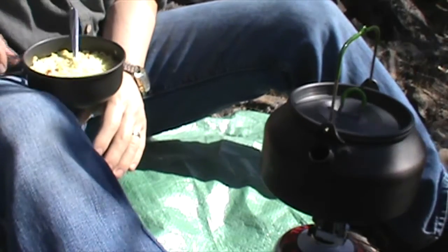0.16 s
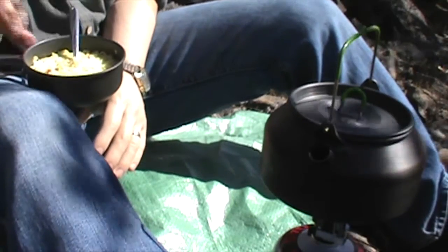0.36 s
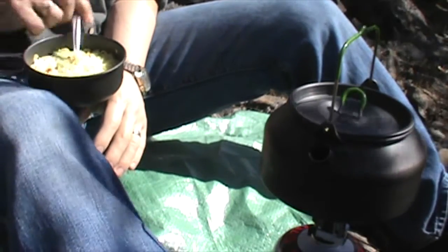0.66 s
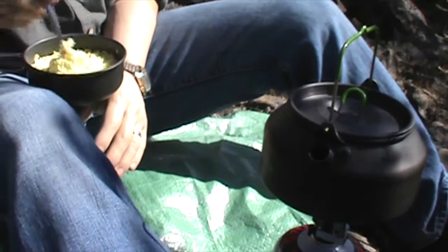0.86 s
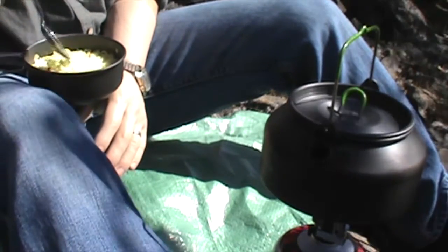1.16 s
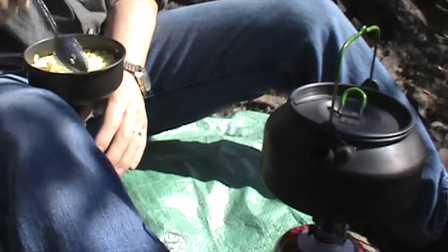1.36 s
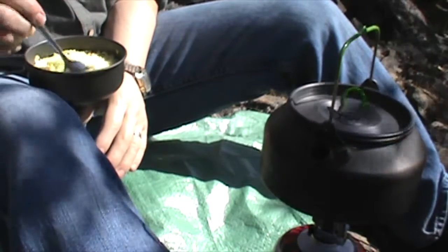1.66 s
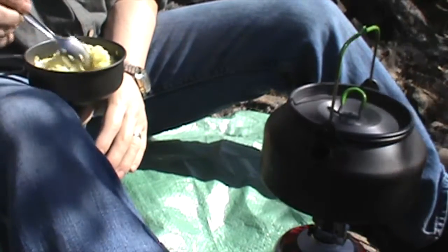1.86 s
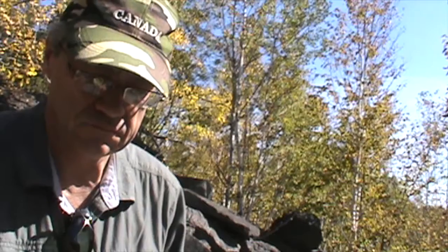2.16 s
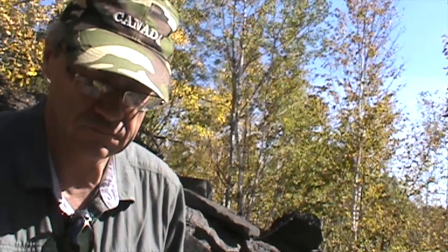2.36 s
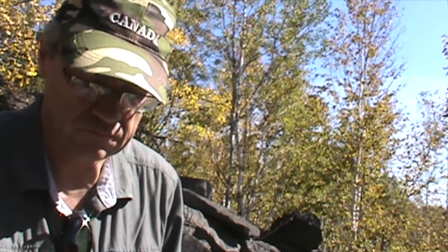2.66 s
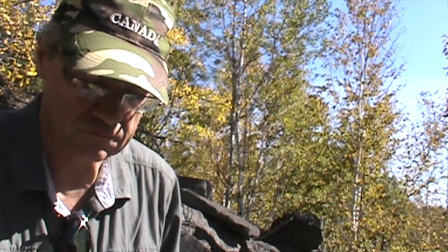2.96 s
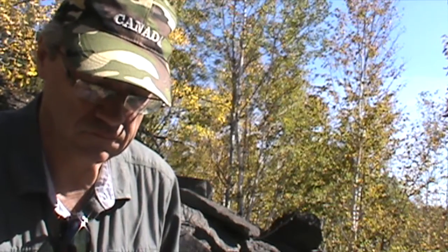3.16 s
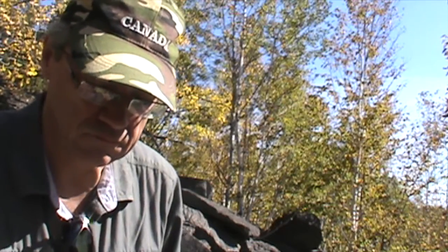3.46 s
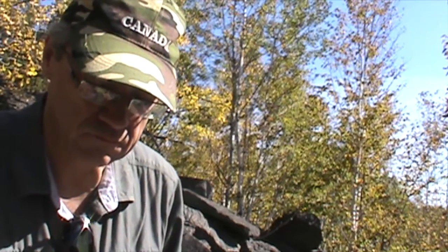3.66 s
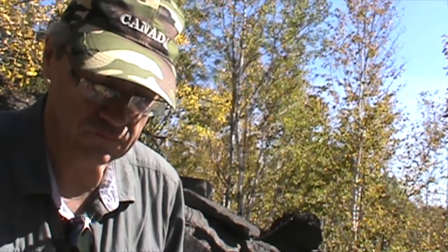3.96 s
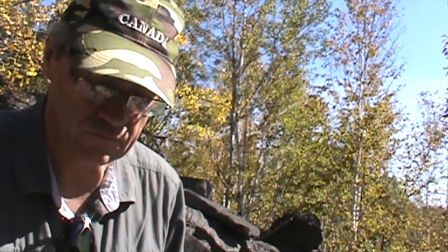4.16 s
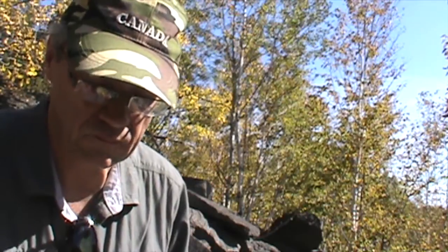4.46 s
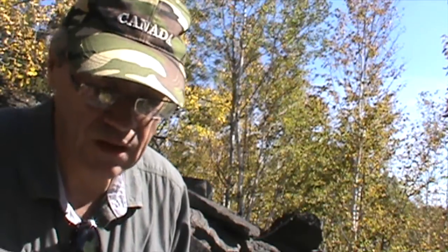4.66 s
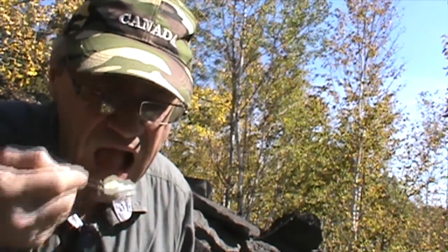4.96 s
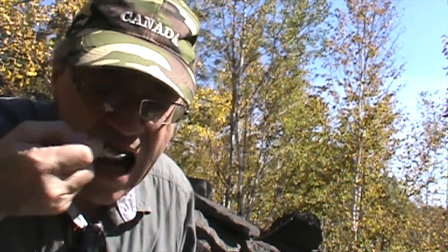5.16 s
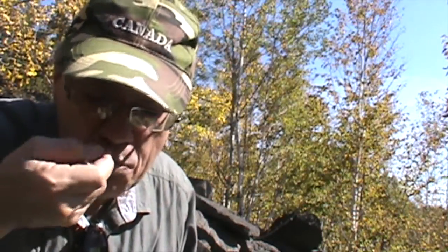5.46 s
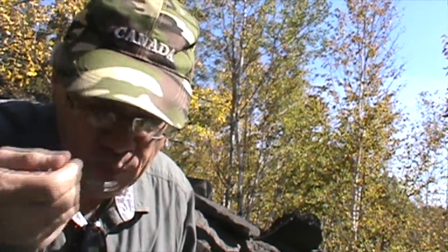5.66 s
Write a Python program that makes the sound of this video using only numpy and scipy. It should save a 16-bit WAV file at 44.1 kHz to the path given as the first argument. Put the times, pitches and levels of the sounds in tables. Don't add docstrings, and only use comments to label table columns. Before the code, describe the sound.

A small gas camp stove hisses brightly over a low roar outdoors, with a crisp spoon click early, then a sudden change to a louder, fuller hiss.

```python
import sys
import numpy as np
from scipy import signal
from scipy.io import wavfile
from scipy.ndimage import uniform_filter1d

SR = 44100
rng = np.random.default_rng(int(sys.argv[2]) if len(sys.argv) > 2 else 0)


def generate_wav(signal):
    frames = np.transpose(np.atleast_2d(signal))
    scaled = np.clip(frames, -1, 1) * 32767
    pcm = np.round(scaled).astype(np.int16)
    wavfile.write(sys.argv[1], SR, pcm)


def level_to_linear(level):
    exponent = np.asarray(level, float) / 20
    return 10 ** exponent


N = 257103
CHANGE_S = 1.985

# time in seconds, gas flow in dB, how far they have turned in stances.
FLOW_AND_TURN = [
    [(0.0, 0.81, .05), (.28, -1.5, .05), (.5, -0.34, .05), (.75, 0.00078, .1), (.93, 1.7, .3),
     (1.16, 0.26, 0.67), (1.51, 1.9, 0.93), (1.95, -0.71, 0.75)],
    [(2.0, -0.4, .05), (2.3, -0.034, .05), (2.8, .1, 0.1), (3.25, 1, 0.18), (3.55, -0.11, 0.74),
     (3.85, -0.14, 1.1), (4.2, .3, 1.56), (4.5, -0.11, 1.6), (5.0, 0.16, 1.8), (5.83, 0.074, 1.8)],
]
FIRST_STANCE = [0, 2]

# pitch in Hz, shift in Hz per stance, level in dB, dB per stance, dB per stance squared.
FLAME_LOBES = [
    [(107, 5, -66, 4, .1), (195, -1, -51.5, .3, 0.2), (754, -1, -50.5, .3, 0.5), (1320, -2, -56, -2.5, 0.8)],
    [(107, 1.7, -58, 11, -4.5), (183, -3, -49.5, -4, 1.3), (725, -49, -47.5, -1.4, 0.01),
     (1346, 4, -58.5, 4, -1.36)],
]
# width in Hz, steepness of the sides (no unit).
FLAME_SKIRTS = [(38, 8.9), (112, 3.12), (386, 3.3), (660, 4)]
# delay in ms, strength relative to the direct sound.
FLAME_ECHOES = [
    [(0.824, 0.19), (1.08, -0.072), (1.304, 0.11), (2.476, 0.14)],
    [(0.816, 0.14), (1.068, -0.12), (1.3, 0.13), (2.444, 0.12)],
    [(1.156, -0.028), (1.476, -0.22), (2.304, -0.081), (3.916, -0.089)],
    [(0.824, -0.12), (1.652, -0.066), (2.228, -0.028), (2.796, -0.057)],
    [(0.8, -0.085), (1.288, -0.093), (2.012, 0.012), (3.964, -0.08)],
]

# pitch in Hz, shift in Hz per stance, level in dB, dB per stance, dB per stance squared.
JET_LOBES = [
    [(6100, .1, -65, 8.0, -5), (6930, 150, -55, 2.5, 0.3), (8220, 60, -53, 2.5, 0.3),
     (9440, -52, -51.5, .3, 0)],
    [(6150, .1, -54, -1.5, 0.5), (7370, -120, -51.5, 5.5, -1.5), (8350, -130, -45.5, -6, 2.5),
     (9520, 92, -50.5, 6.5, -3.0)],
]
# width in Hz, steepness of the sides (no unit).
JET_SKIRTS = [(664, 3.6), (970, 5.4), (1230, 4.4), (980, 4.65)]
# delay in ms, strength relative to the direct sound.
JET_ECHOES = [
    [(0.374, -0.055), (0.618, 0.18), (0.738, 0.048), (0.906, 0.18), (1.05, 0.081), (1.194, 0.11),
     (1.314, 0.056), (2.17, 0.054), (2.378, 0.057)],
    [(0.602, 0.13), (0.718, 0.1), (1.174, 0.15), (1.27, 0.078), (1.626, -0.096), (1.766, -0.13),
     (2.19, 0.098), (2.382, 0.085), (2.806, 0.029)],
    [(0.614, 0.043), (0.758, -0.029), (0.942, -0.053), (1.346, -0.087), (1.482, 0.11), (1.846, -0.02),
     (2.098, 0.073), (2.246, -0.09), (3.522, 0.27)],
    [(0.462, 0.076), (0.77, -0.041), (0.914, 0.1), (1.178, -0.066), (1.338, -0.04), (1.446, 0.025),
     (1.826, 0.074), (1.966, 0.06), (3.082, 0.074)],
    [(0.65, 0.072), (0.834, -0.047), (1.43, 0.034), (1.686, 0.021), (1.798, -0.0053), (1.978, 0.113),
     (2.146, 0.097), (2.31, -0.095), (3.582, -0.039)],
]
# level in dB, dB per stance.
FIZZ_LEVEL = [(-56, 0.91), (-50, -2.2)]
# level in dB, dB per stance.
AIR_LEVEL = [(-67, -.8), (-56.5, -3.5)]
# frequency in Hz, level in dB.
FIZZ_SHAPE = [(1300, -17), (1800, -2.5), (3200, 0.5), (4000, -1), (6000, 1.0), (10000, -4), (11000, -7.5),
              (13000, -25)]
# frequency in Hz, level in dB.
AIR_SHAPE = [(9500, -12), (10500, 8), (11200, 1), (12500, 0), (13500, -3.5), (16000, -5)]

# start in seconds, peak in dB, brightness in dB per octave, ring length factor.
TAPS = [(.2199, -16.5, -2.5, .35), (.2207, -24, .1, .5), (.2217, -28, 1, .5), (.2245, -21, 3, .5),
        (.2249, -15.5, 1.5, .5), (.2256, -21, -5, .8), (.2262, -22, .1, .6), (.227, -18.5, 2, .4),
        (.229, -31, -4, 1.2), (.2312, -34, -5, 1.2)]
# start in seconds, peak in dB, brightness in dB per octave,
# ring length factor.
KNOCKS = [(1.5875, -24.5, .5, .7), (1.5882, -31, .5, .7), (1.5889, -33, -2, .8), (1.5901, -33, -5, .7),
          (.8795, -42, -.3, 1.1), (3.8946, -33, 9.1, .9), (3.9003, -36, 8.1, .9), (4.2482, -36, 4.1, .9)]
# pitch in Hz, level in dB, seconds to fade by 60 dB.
POT_WALL = [(2400, -13, 0.016), (2760, -3, 0.015), (3190, -2, 0.013), (4380, -6, 0.008),
            (5040, -2.5, 0.021), (5720, -1, 0.012), (6650, 4, 0.012), (6950, -2, 0.011), (8170, -2, 0.014),
            (9200, -1, 0.017), (10340, 2, 0.012), (11470, 0, 0.0091), (12700, -12, 0.0076),
            (14300, -15, .007)]
# pitch in Hz, level in dB, seconds to fade by 60 dB.
KNOCKED_BODY = [(695, -7, 0.013), (1080, -1.5, 0.013), (1440, -5, .012), (1800, -4.5, 0.013),
                (2230, -5, 0.0096), (2610, 1, 0.01), (3000, 0, 0.0091), (3560, 1, 0.0056), (4350, -4, .006),
                (5530, -6, .010), (7000, -21, 0.0044), (8500, -6, 0.0057), (11000, -10, 0.0046),
                (12800, -20, .003)]
# start in seconds, peak in dB, pitch in Hz, glide in octaves, length in seconds.
SCRAPES = [(.683, -46.5, 3000, -.12, 0.009), (.684, -51, 3900, -.03, 0.0082), (.678, -53, 4500, -.05, .006),
           (.762, -48.5, 2130, -0.047, 0.017), (.763, -54, 2450, .03, 0.011), (0.774, -54, 2400, .25, .012),
           (0.783, -47, 1390, .2, 0.0098), (0.872, -49, 1800, 0.071, 0.0077), (.878, -49.5, 2250, .2, .008),
           (4.245, -46, 4900, .1, .005), (4.838, -42, 112, .05, 0.029)]

WIND_DB = [-77, -62.5]
# frequency in Hz, level in dB.
WIND_SHAPE = [(10, -21), (30, -8), (55, 16), (80, -6), (200, -30), (400, -50)]

HISS_DB = [-68, -63.5]
# pitch in Hz, level in dB after the change.
WHINE = [(15734.2, -71), (15747.3, -71), (15674.3, -88), (15494.5, -90)]
# frequency in Hz, likeness from 0 to 1.
LIKENESS = [(160, 1), (450, 0.82), (740, 0.97), (2010, .64), (3330, 0.66), (6300, 0.9), (8200, 0.98),
            (12000, 0.96)]
# frequency in Hz, left minus right in dB.
LEAN = [(210, 0.0), (400, -.5), (1170, -1.2), (1790, -1.0), (2740, -1), (6410, -1.1), (9810, 0.0),
        (15000, 1)]
# frequency in Hz, lead of the left in radians.
LEAD = [(0, 0.063), (1120, -.051), (1550, 0.16), (2070, -0.39), (2760, .11), (5940, -0.058), (6720, -0.51),
        (7490, 0.0)]

FRAME, HOP = 2048, 512
LAP = 8
HZ = np.fft.rfftfreq(FRAME, 1 / SR)[:, None]
SPLIT = round(CHANGE_S * SR / HOP)
T = np.r_[:SPLIT + LAP, SPLIT - LAP:N // HOP + LAP] * HOP / SR
SECOND = np.arange(len(T)) >= SPLIT + LAP


def flame():
    corner_hz = np.where(SECOND, 66, 88)
    low_cut = 1 / (1 + (corner_hz / (HZ + 1)) ** 15.0)
    power = lobes(FLAME_LOBES, FLAME_SKIRTS, follows=0.2) * low_cut
    flicker_db = 0.84 * patches(size=(5, 15))
    return power * comb(FLAME_ECHOES, depth=1.27) * level_to_linear(flicker_db) ** 2


def jet():
    flow_db, turn = curves(FLOW_AND_TURN)
    fizz_start_db, fizz_step_db = by_view(FIZZ_LEVEL)
    air_start_db, air_step_db = by_view(AIR_LEVEL)
    fizz_db = fizz_start_db + fizz_step_db * turn + 0.3 * flow_db
    air_db = air_start_db + air_step_db * turn + 0.3 * flow_db
    power = lobes(JET_LOBES, JET_SKIRTS, follows=1) + band(fizz_db, level_to_linear(read(FIZZ_SHAPE, HZ)) ** 2)
    power *= comb(JET_ECHOES, depth=1.15)
    power += band(air_db, level_to_linear(read(AIR_SHAPE, HZ)) ** 2)
    drift_db = 1.2 * patches(size=(8, 30))
    flutter_db = 0.82 * patches(size=(400, 2))
    return power * level_to_linear(drift_db + flutter_db) ** 2


def lobes(tables, skirts, follows):
    flow_db, turn = curves(FLOW_AND_TURN)
    power = 0
    for pair, skirt in zip(zip(*tables), skirts):
        hz, hz_step, db, db_step, db_bend = by_view(pair)
        level_db = db + db_step * turn + db_bend * turn ** 2 + follows * flow_db
        power = power + lobe(level_db, hz + hz_step * turn, *skirt)
    return power


def lobe(db, hz, width_hz, steep):
    return band(db, 1 / (1 + abs(2 * (HZ - hz) / width_hz) ** steep))


def comb(echoes, depth):
    ripples = np.hstack([sum(g * np.cos(2 * np.pi * HZ * ms / 1000) for ms, g in rows)
                         for rows in echoes])
    first = np.where(SECOND, FIRST_STANCE[1], FIRST_STANCE[0])
    place = np.clip(curves(FLOW_AND_TURN)[1] + first, 0, len(echoes) - 1)
    before = np.minimum(place.astype(int), len(echoes) - 2)
    ripple = ripples[:, before] + (place - before) * (ripples[:, before + 1] - ripples[:, before])
    return np.exp(2 * depth * ripple)


def spoon():
    out = np.zeros((2, N))
    for events, modes in ((TAPS, POT_WALL), (KNOCKS, KNOCKED_BODY)):
        spots = rng.standard_normal((12, 24, 3))
        for (s, *blow), spot in zip(events, spots):
            add(out, s, strike(modes, spot, *blow))
    sides = level_to_linear(np.array([[.6], [-.6]]))
    for s, peak_db, hz, glide, length in SCRAPES:
        u = np.linspace(0, 1, round(length * SR))
        turns = np.cumsum(hz * 2 ** (glide * u)) / SR
        swell = np.sin(np.pi * u ** 0.63)
        add(out, s, level_to_linear(peak_db) * swell * np.sin(2 * np.pi * turns) * sides)
    return out


def strike(modes, spot, peak_db, tilt_db, ring):
    t = np.arange(2000) / SR
    hz, db, t60 = np.transpose(modes)[:, :, None]
    strength, tuning, side_phase = spot[:len(modes)].T[:, :, None]
    fade_db = -60 * t / (t60 * ring)
    level = level_to_linear(db + tilt_db * np.log2(hz / 4000) + 2.5 * strength + fade_db)
    turn = 2 * np.pi * hz * (1 + 0.022 * tuning) * t
    channels = []
    for side in (1, -1):
        tones = level * np.sin(turn + side * 0.15 * side_phase)
        channels.append(tones.sum(0) * level_to_linear(side * 0.9 / 2))
    sound = np.array(channels)
    sound *= np.sin(np.pi / 2 * np.minimum(t / 0.00035, 1)) ** 2
    sound = signal.lfilter(*signal.butter(2, 0.75 * hz.min(), "high", fs=SR), sound)
    return level_to_linear(peak_db) * sound / abs(sound.mean(0)).max()


def add(mix, s, sound):
    part = mix[:, round(s * SR):][:, :sound.shape[1]]
    part += sound[:, :part.shape[1]]


def wind():
    dying_db = WIND_DB[1] - 1.7 * (T - CHANGE_S)
    level_db = np.where(SECOND, dying_db, WIND_DB[0])
    gust_db = 2.5 * patches(size=(9, 10))
    return band(level_db, level_to_linear(read(WIND_SHAPE, HZ)) ** 2) * level_to_linear(gust_db) ** 2


def electronics():
    t = np.arange(N) / SR
    whine = sum(level_to_linear(db) * np.sqrt(2) * np.sin(2 * np.pi * (hz * t + rng.random())) for hz, db in WHINE)
    hiss = rng.standard_normal(N) + 0.69 * rng.standard_normal((2, N))
    hiss_gain = level_to_linear(np.where(t < CHANGE_S, *HISS_DB))
    whine_gain = level_to_linear(np.where(t < CHANGE_S, -7., 0))
    return hiss * hiss_gain + whine * whine_gain


def evened(x):
    return x / np.sqrt(np.mean(x ** 2) + 1e-20)


def read(points, hz):
    f, value = np.transpose(points)
    return np.interp(np.log(hz + 1), np.log(f + 1), value)


def curves(tables):
    (s0, *first), (s1, *second) = map(np.transpose, tables)
    return [np.where(SECOND, np.interp(T, s1, b), np.interp(T, s0, a)) for a, b in zip(first, second)]


def by_view(pair):
    return [np.where(SECOND, b, a) for a, b in zip(*pair)]


def band(db, shape):
    return level_to_linear(db) ** 2 * shape / shape.sum(0)


def patches(size):
    field = rng.standard_normal((len(T), len(HZ))).T
    smooth = uniform_filter1d(field, size[0], axis=0)
    return evened(uniform_filter1d(smooth, size[1], axis=1))


def heard(power):
    a, b, c, d = rng.standard_normal((len(T), len(HZ), 4)).T
    same = np.clip(read(LIKENESS, HZ), 0, .993) ** 0.77
    left = a + 1j * b
    right = same * left + np.sqrt(1 - same ** 2) * (c + 1j * d)
    right = right * np.exp(-1j * read(LEAD, HZ))
    lean = level_to_linear(read(LEAN, HZ) / 2)
    z = np.array([left * lean, right / lean]) * np.sqrt(power)
    return level_to_linear(2.0) * signal.istft(z, nperseg=FRAME, noverlap=FRAME - HOP)[1]


def scene():
    both = heard(flame() + jet() + wind())
    change = round(CHANGE_S * SR)
    stove = np.hstack([both[:, :change], both[:, change + 2 * LAP * HOP:]])
    return stove[:, :N] + spoon()


def band_limit(x):
    return signal.sosfilt(signal.butter(12, 16620, fs=SR, output="sos"), x)


def record(dry):
    edge = signal.firwin(1023, 15810, window=("kaiser", 10), fs=SR)
    limited = signal.oaconvolve(dry + electronics(), edge[None], "same", axes=1)
    return band_limit(limited)


dry = scene()
out = record(dry)
generate_wav(out)
```